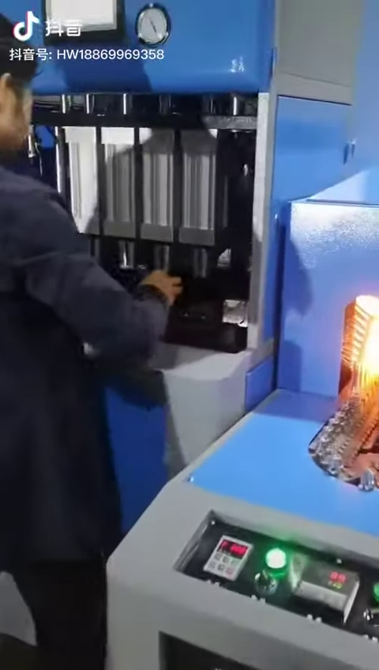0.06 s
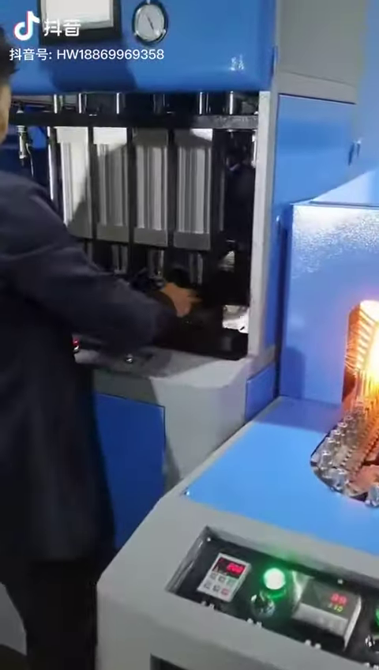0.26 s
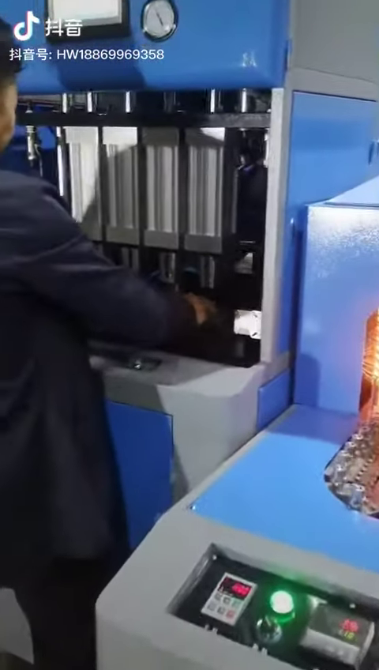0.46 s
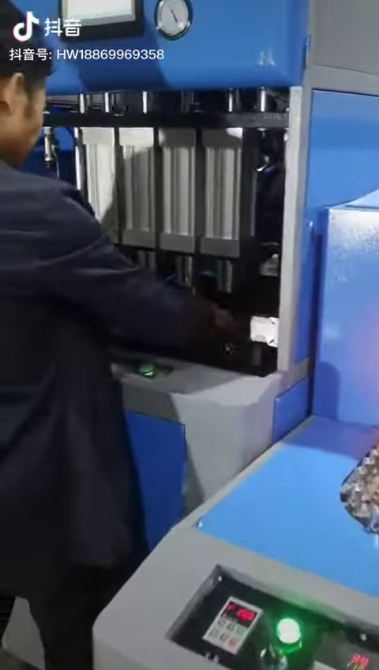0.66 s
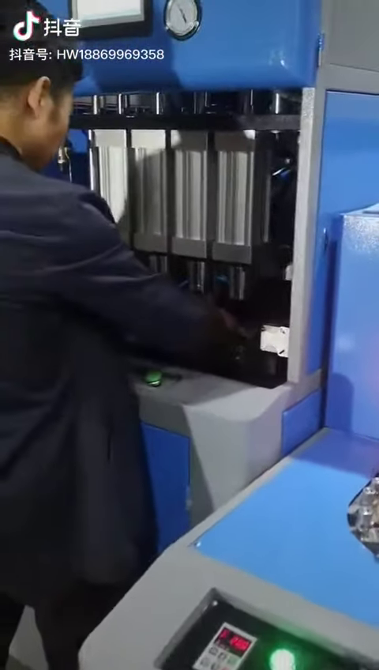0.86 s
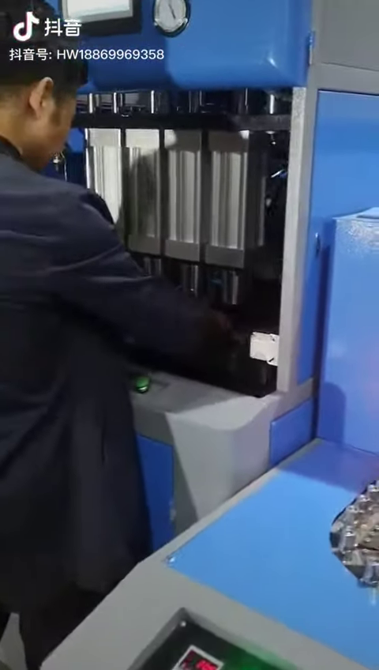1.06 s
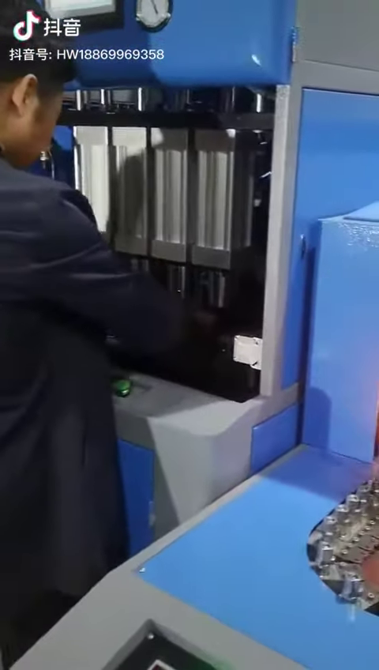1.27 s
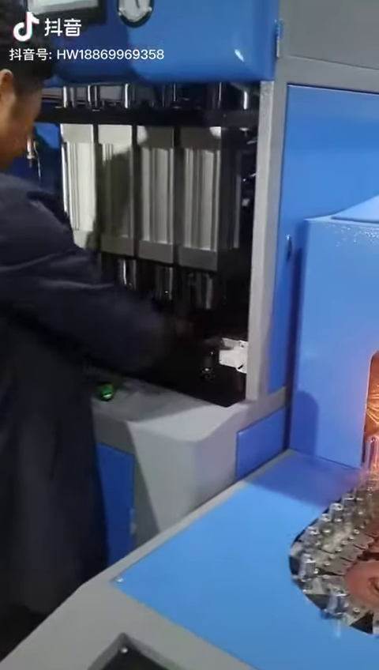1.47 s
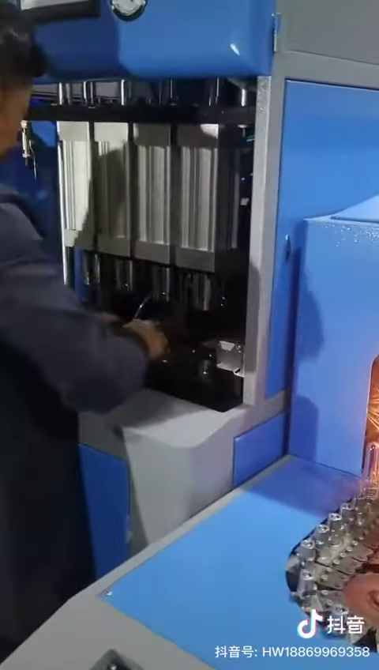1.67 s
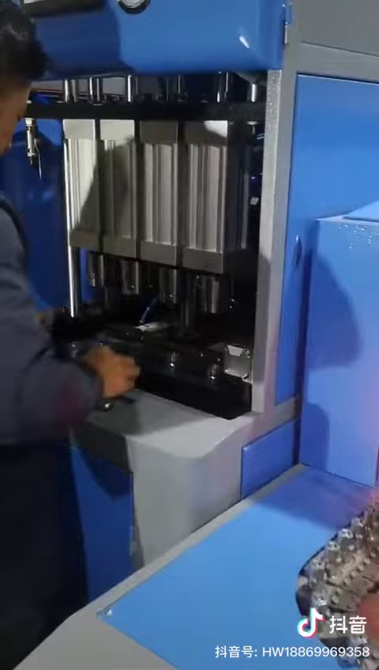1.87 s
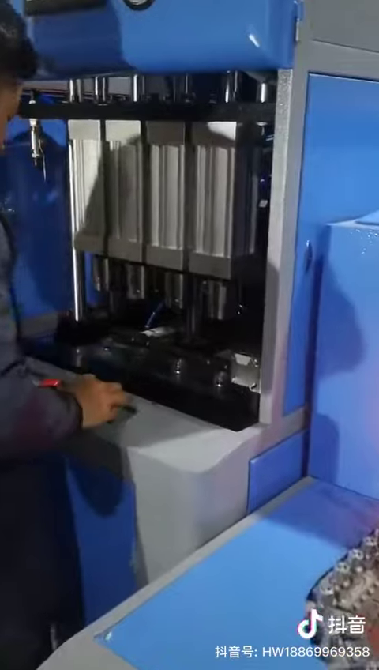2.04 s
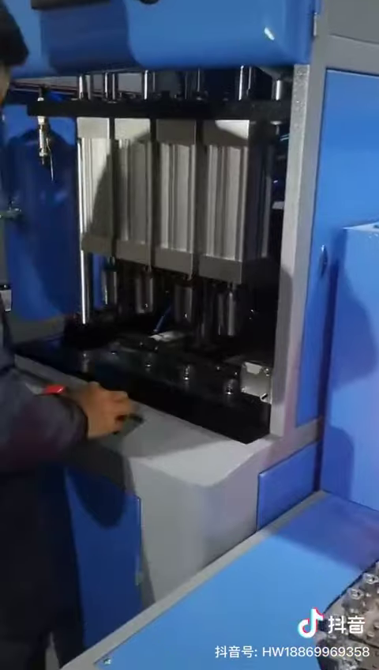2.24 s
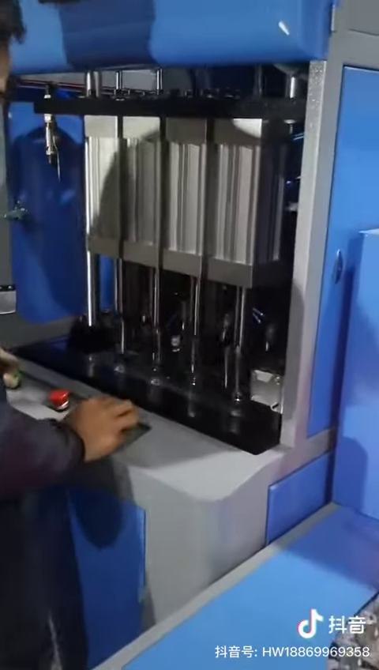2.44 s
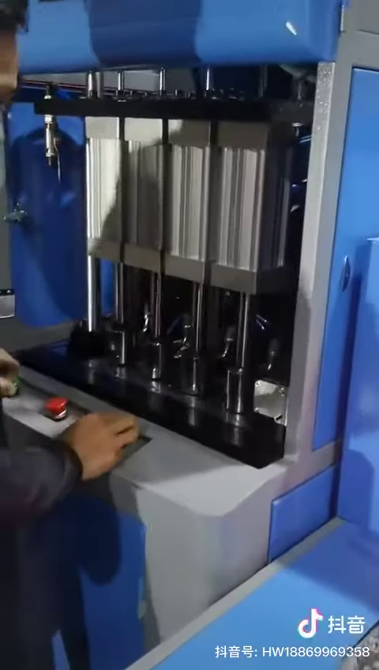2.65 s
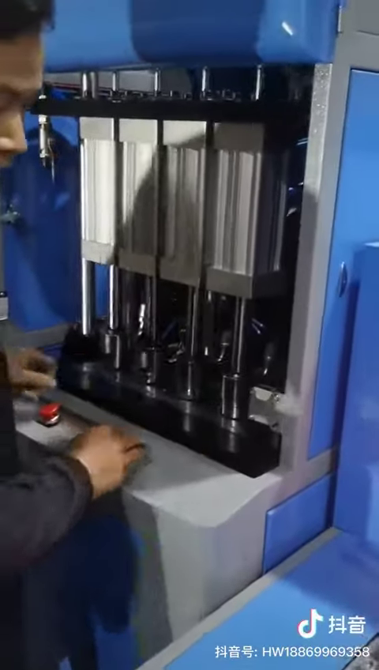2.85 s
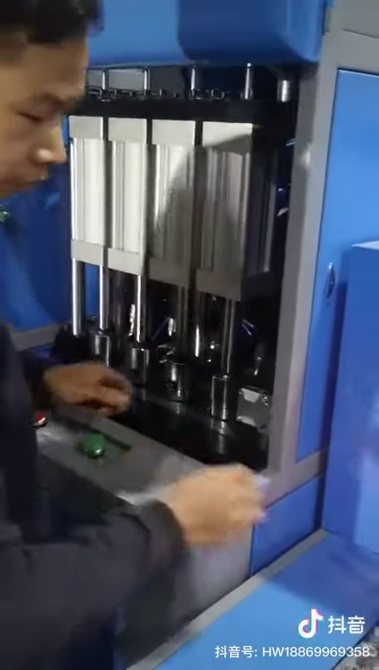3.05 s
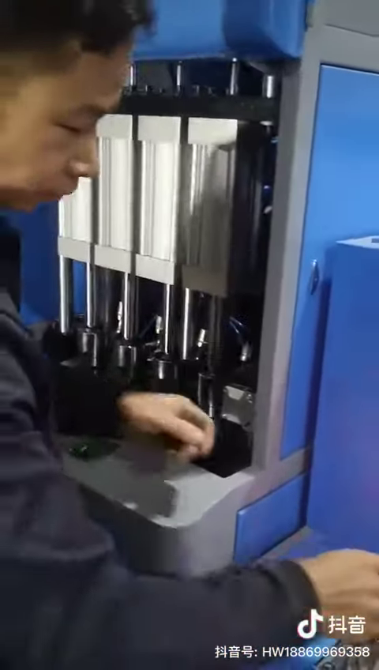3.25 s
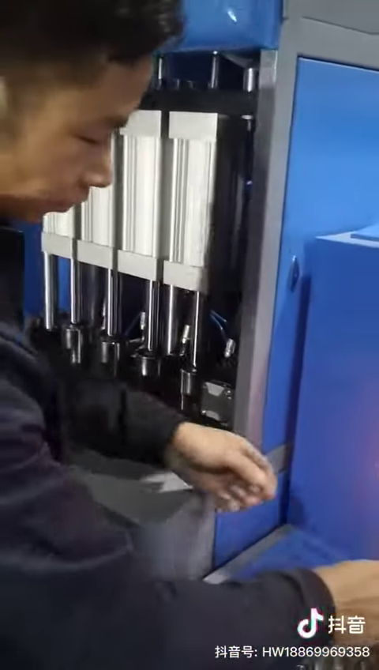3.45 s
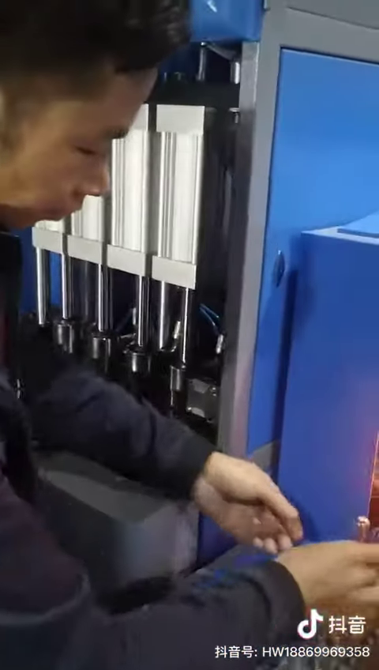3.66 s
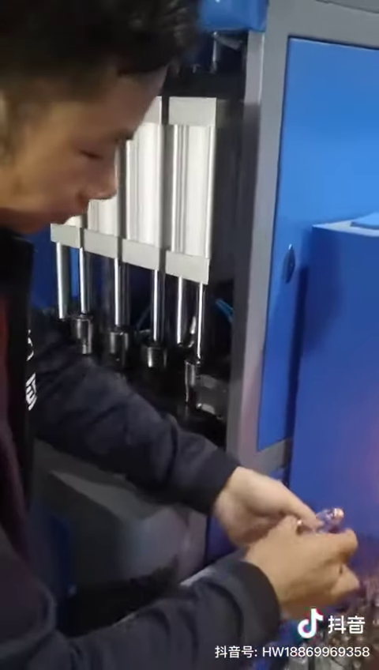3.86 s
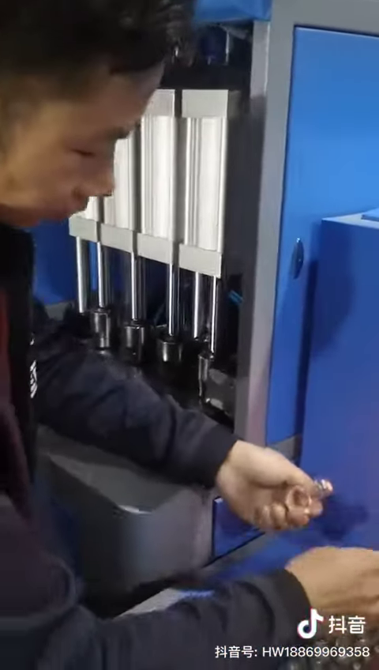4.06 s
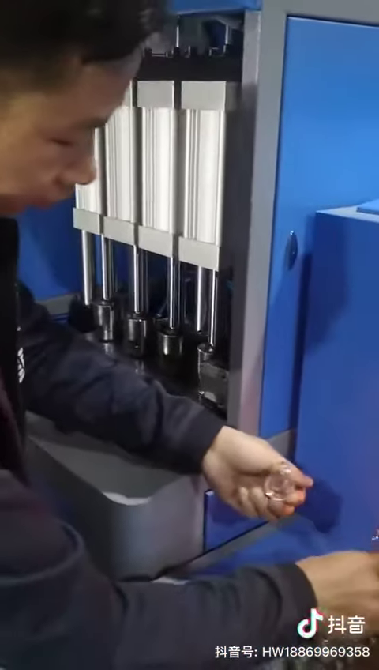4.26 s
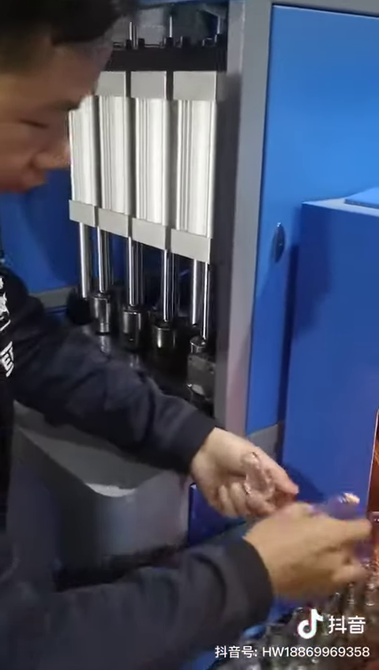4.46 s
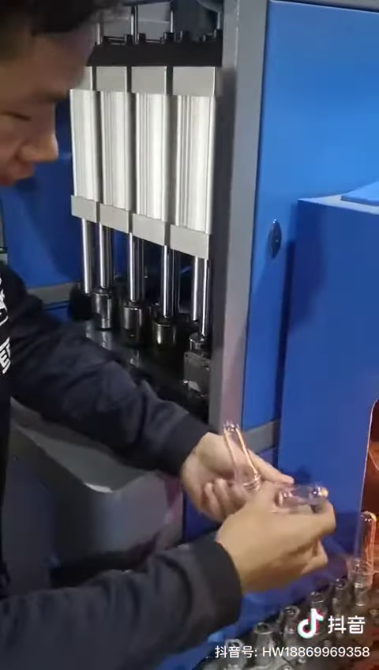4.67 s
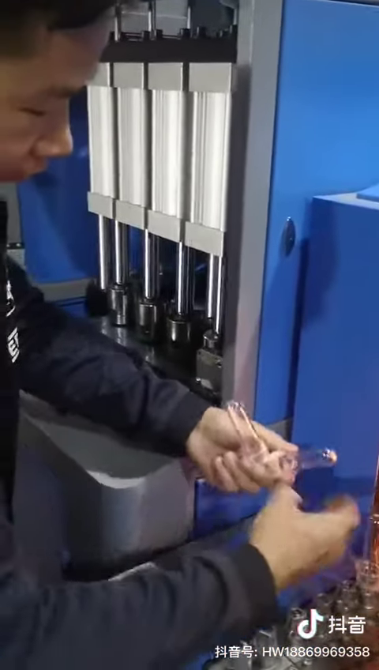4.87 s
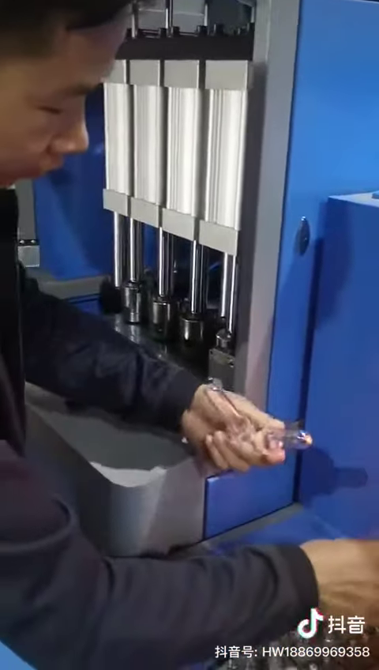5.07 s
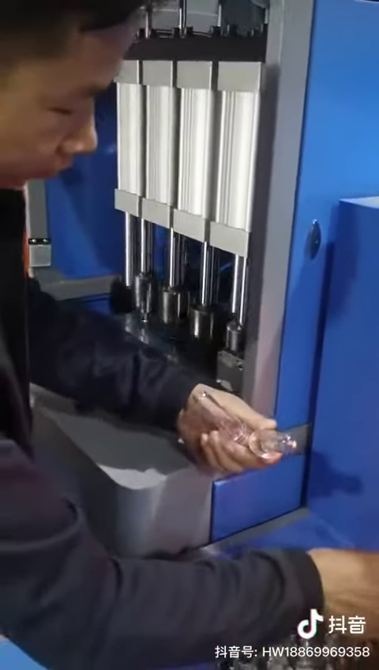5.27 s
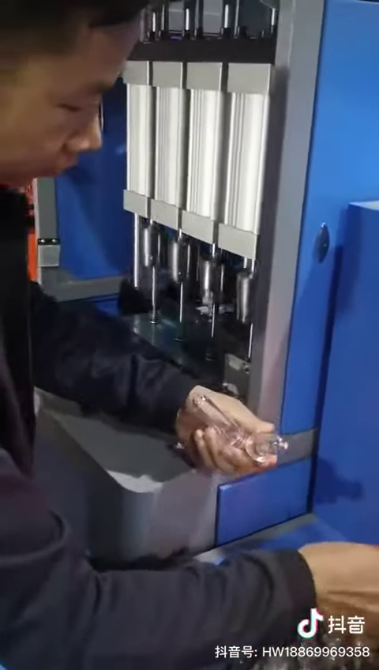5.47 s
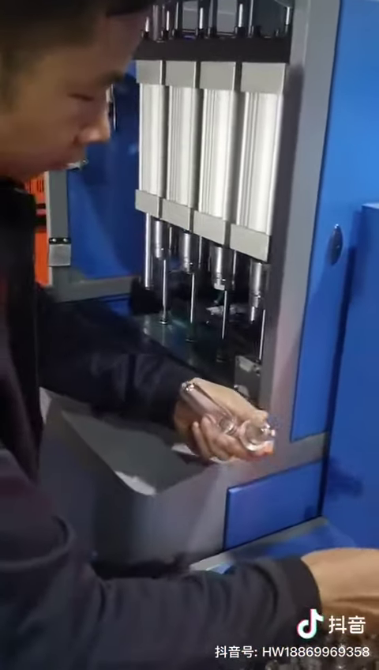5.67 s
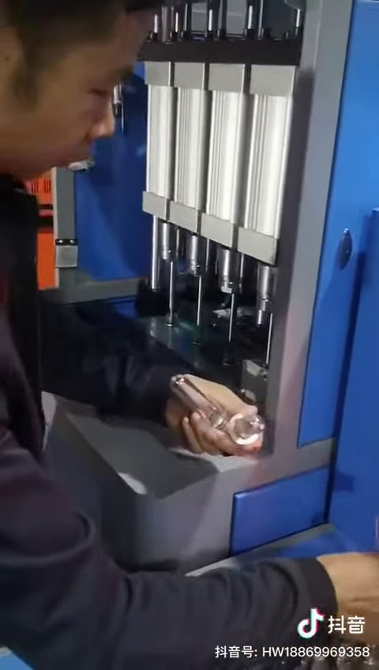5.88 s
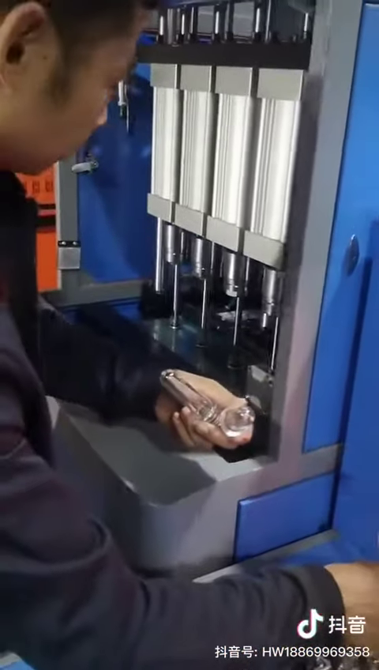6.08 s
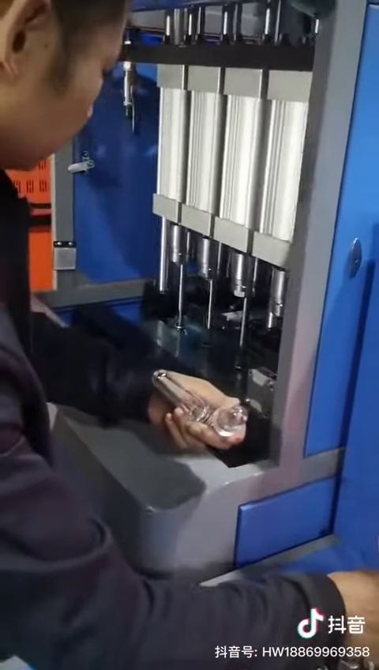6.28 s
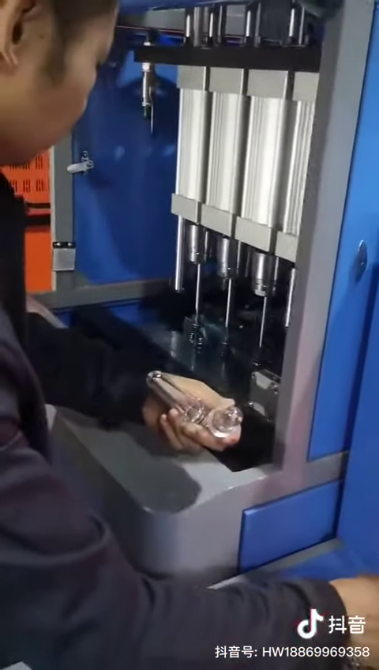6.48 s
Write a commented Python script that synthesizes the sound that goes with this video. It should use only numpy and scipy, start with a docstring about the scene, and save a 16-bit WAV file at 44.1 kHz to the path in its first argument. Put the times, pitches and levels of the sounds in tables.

```python
"""Air hisses out and squeaks die away over the throbbing drone of a piston compressor in a factory hall.
Then a bottle blow-moulding machine works through its cycle: noise jets vent and cracks with ringing steel
clack as the mould closes and the rods go down. Air leaks while the bottles are blown, then blows off in loud
blasts that duck the drone, and the mould opens with low, swinging thuds. Gliding tones squeak and grainy
noise scrapes now and then; rumble and whirr lie beneath, and the hall echoes the air and the metal."""
import sys
import numpy as np
from scipy import signal
from scipy.fft import rfft, irfft
from scipy.io import wavfile
from scipy.ndimage import uniform_filter1d

SR = 44100
rng = np.random.default_rng(int(sys.argv[2]) if len(sys.argv) > 2 else 0)


def unload_wav(signal):
    """Save mono or channel-first audio to the path in sys.argv[1] as 16-bit WAV at rate SR, clipped to [-1, 1]."""
    wavfile.write(
        sys.argv[1],
        SR,
        np.round(np.clip(np.atleast_2d(signal).T, -1, 1) * 32767).astype(np.int16),
    )


N = 287532
T = np.arange(N) / SR
BINS = np.maximum(np.arange(N // 2 + 1) * SR / N, 1)  # [Hz]


def from_db(db):
    """Decibels to gain."""
    return 10 ** (np.asarray(db) / 20)


def rms_one(x):
    """Scale so that the mean of the channels has rms 1."""
    mid = np.atleast_2d(x).mean(0)
    return x / np.sqrt(np.mean(mid ** 2) + 1e-20)


def over_hz(points):
    """Join (frequency [Hz], value) points on a log-frequency axis."""
    hz, value = np.transpose(points)
    return np.interp(np.log(BINS), np.log(hz), value)


def drift(rate_hz):
    """Random wander with rms 1: noise whose spectrum falls off above the given rate."""
    white = rfft(rng.standard_normal(N))
    return rms_one(irfft(white / (1 + (BINS / rate_hz) ** 2), N))


def burst(start, swell, t60):
    """Smooth swell, then an exponential fade that drops 60 dB in t60 seconds."""
    age = T - start
    opening = np.clip(age / max(swell, 1e-4), 0, 1) ** 2
    fade_db = -60 * np.clip((age - swell) / t60, 0, 3)
    return opening * from_db(fade_db)


# How alike left and right are: (frequency [Hz], correlation [-1 to 1, limited on use])
STEREO_LIKENESS = [(60, 2), (140, 0.7), (200, 0.88), (350, 0.38), (600, -0.13), (1500, 0.12), (4000, 0),
                   (15000, 0)]
# Tonal balance between the sides: (frequency [Hz], left minus right [dB])
STEREO_LEAN = [(300, 0), (690, 2.5), (1280, -1), (2350, -1), (4330, 0.5), (6800, 4.5), (9000, 0),
               (13000, -6.5)]


def spread_stereo(spectra):
    """Mix two unrelated spectra to left and right: alike in the bass, each side with its own colour."""
    alike = np.clip(over_hz(STEREO_LIKENESS), -1, 1)
    sides = np.array([[1], [-1]])
    shared = np.sqrt(1 + alike) * spectra[0]
    opposed = sides * np.sqrt(1 - alike) * spectra[1]
    return irfft((shared + opposed) * from_db(sides * over_hz(STEREO_LEAN) / 2), N)


def noise(spectrum_db):
    """Stereo noise of the given colour; the mean of its channels has rms 1."""
    white = rfft(rng.standard_normal((2, N)))
    return rms_one(spread_stereo(white * from_db(spectrum_db)))


def cabinet(echo_share, longest_s=.03, count=14):
    """Reflections off the steel panels comb the sound, differently on each side; in dB."""
    echoes = np.zeros((2, N))
    for side in echoes:
        delays = (rng.uniform(.05, 1, count) * longest_s * SR).astype(int)
        side[delays] = rng.choice([-1, 1], count) * echo_share / np.sqrt(count)
    echoes[:, 0] = 1  # the direct sound
    return 20 * np.log10(abs(rfft(echoes)) + 1e-6)


# Steady beds as the microphone moves about: (time [s], drone [dB], rumble [dB], whirr [dB])
STEADY_LEVELS = [(0, -33.5, -38, -40), (.9, -31.5, -37, -39), (2.2, -31.5, -38, -39.5),
                 (3.3, -32, -38, -37.5), (4.0, -29.5, -43, -40), (4.9, -31, -38, -40.5),
                 (5.8, -30.5, -37, -41.5), (6.52, -30.5, -38, -40)]


def steady_gains():
    """Gains of the drone, the rumble and the whirr over time."""
    s, *columns = np.transpose(STEADY_LEVELS)
    return [from_db(np.interp(T, s, db)) for db in columns]


# Low rumble of the hall: (frequency [Hz], relative level per Hz [dB])
RUMBLE_COLOUR = [(25, -9), (50, -3), (90, -3), (140, 0), (190, 2.5), (250, -5.5), (340, -4), (450, -16),
                 (700, -50)]
# Fans and conveyors: (frequency [Hz], relative level per Hz [dB])
WHIRR_COLOUR = [(300, -5.5), (520, -16), (700, -17.5), (900, -14), (1120, -11), (1330, -12), (1550, -8),
                (2400, -8.5), (3100, -17.5), (4200, -22.5), (5050, -21.5), (6500, -28), (9000, -32),
                (15000, -57)]


def background(rumble_gain, whirr_gain, flutter_db=0.88):
    """Rumble of the hall and the fluttering whirr of fans and conveyors, both as coloured noise."""
    rumble = rumble_gain * noise(over_hz(RUMBLE_COLOUR))
    whirr = whirr_gain * noise(over_hz(WHIRR_COLOUR) + cabinet(echo_share=0.37))
    return rumble + whirr * from_db(flutter_db * drift(25))


def drone(orders, stroke, sweep, turns_per_s=12.82):
    """Pipes and tank smear each stroke into a chirping throb: each order is delayed against the one below.

    stroke is a share of a turn; sweep is the delay per order, also in turns (negative is earlier).
    """
    turns = turns_per_s * T - stroke + .003 * drift(.7)
    lines = 0
    for k, db in orders:
        order = round(k)
        lines = lines + from_db(db) * np.cos(2 * np.pi * order * (turns - sweep * order / 2))
    return rms_one(lines)


# Compressor harmonics before the throb changes: (multiple of turn rate, relative level [dB])
EARLY_ORDERS = [(2, -14), (3, -15), (4, -4), (5, -17), (6, -18), (7, -10), (8, -18), (9, -14), (11, -10),
                (12, -8), (13, -9), (14, -8), (15, -3), (16, -7), (17, -10), (18, -19), (20, -16),
                (21, -17), (22, -16), (23, -21), (25, -22), (26, -19), (27, -17), (30, -20), (32, -20)]
# Compressor harmonics after the throb changes: (multiple of turn rate, relative level [dB])
LATE_ORDERS = [(2, -13), (3, -14), (4, -4), (5, -20), (6, -16), (7, -8), (9, -14), (10, -16), (11, -8),
               (12, -5), (13, -11), (14, 0), (15, -18), (16, -7), (17, -11), (18, -12), (20, -23),
               (21, -17), (24, -19), (26, -22), (27, -18), (28, -18), (29, -22)]


def compressor(change_s=2.3, crossfade_s=0.1):
    """Piston-stroke harmonics, whose strongest line steps down once as the throb changes."""
    late = np.clip((T - change_s) / crossfade_s + .5, 0, 1)
    rising = drone(EARLY_ORDERS, stroke=.055, sweep=.122)
    lumpy = drone(LATE_ORDERS, stroke=.24, sweep=-.376)
    return np.sqrt(1 - late) * rising + np.sqrt(late) * lumpy


# Parts that slide and rub: (time [s], swell [s], t60 [s], level [dB], centre [Hz])
SLIDING_PARTS = [(.46, 0.065, 0.96, -34.5, 232), (.47, 0.04, 0.89, -45.5, 730),
                 (.69, 0.032, 0.43, -43, 2850), (.69, .06, 0.78, -45, 915), (2.21, .012, .15, -55, 11000),
                 (2.275, .015, .2, -57, 11000), (3.313, 0.011, 0.27, -43.5, 625),
                 (5.64, 0.041, 0.26, -31.5, 710), (5.66, 0.045, .35, -36, 446),
                 (5.67, 0.025, 0.26, -32, 271), (5.75, .15, 2.5, -50.5, 845),
                 (6.2, 0.053, 0.17, -38.5, 8900), (6.3, 0.02, 0.9, -40.5, 8600),
                 (6.355, 0.02, 0.25, -39, 1790), (6.36, 0.088, 0.79, -35, 228),
                 (6.485, 0.013, .3, -38, 2600)]


def scrapes(grain_db=3.0, sharpness=2.46):
    """Sliding parts stick and slip, so their noise comes in grains, each part around its own frequency."""
    rubbing = 0
    for s, swell, t60, db, hz in SLIDING_PARTS:
        colour_db = -20 * np.log10(1 + (sharpness * np.log(BINS / hz)) ** 4)
        rubbing = rubbing + from_db(db) * burst(s, swell, t60) * noise(colour_db)
    return rubbing * from_db(grain_db * drift(140))


# Squeaks and whistles: (time [s], swell [s], t60 [s], first pitch [Hz], last pitch [Hz], width [Hz], level [dB])
SQUEAK_TONES = [(0, 0.0032, 0.45, 6570, 6630, 23, -27.5), (0, 0.014, 0.31, 9030, 8700, 54, -35.5),
                (0, .02, 2, 736, 744, 18, -45), (0, 0.016, 1.6, 1730, 1664, 44, -46),
                (0, .02, 2, 2040, 2100, 40, -43), (0, 0.316, 1.8, 2445, 2482, 60, -39),
                (0.029, 0.056, 0.71, 6960, 6904, 16, -27), (0.121, 0.042, 0.35, 7000, 6885, 15, -16.5),
                (0.191, 0.021, 0.44, 6930, 6900, 170, -25), (.05, .11, .3, 13980, 13800, 30, -47),
                (.23, 0.032, 0.11, 6040, 5940, 650, -34), (.265, 0.016, 0.29, 9130, 9280, 69, -29.5),
                (4.82, 0.014, 0.068, 5210, 5060, 250, -27), (5.14, .08, .15, 10100, 10000, 700, -30.5),
                (5.32, 0.017, 0.1, 5260, 4990, 300, -21), (5.38, 0.017, 0.18, 2454, 2433, 240, -11.5),
                (5.45, 0.18, 0.43, 12700, 12270, 450, -25.5), (5.6, 0.093, 0.12, 12600, 12260, 600, -25),
                (5.65, 0.053, 0.57, 535, 532, 69, -42), (6.28, 0.021, 0.18, 6680, 6320, 100, -22.5),
                (6.31, 0.037, 0.16, 6340, 5720, 900, -26), (6.365, 0.015, 0.16, 1706, 1575, 120, -27)]


def squeaks(pure_width_hz=70):
    """Tones that glide in pitch as they sound: the narrow ones sing, the wide ones are breathy."""
    out = np.zeros((2, N))
    for start, swell, t60, first_hz, last_hz, width, db in SQUEAK_TONES:
        hz = np.interp(T, [start, start + swell + t60 / 4], [first_hz, last_hz])
        pure = np.exp(-width / pure_width_hz)
        unsteady = (drift(width / 2) + 1j * drift(width / 2)) / np.sqrt(2)
        breath = np.sqrt(pure) + np.sqrt(1 - pure) * unsteady
        tone = breath * np.exp(2j * np.pi * np.cumsum(hz) / SR) * burst(start, swell, t60)
        lean = np.interp(first_hz, BINS, over_hz(STEREO_LEAN))
        side_gains = from_db(db + np.array([[lean], [-lean]]) / 2)
        out += side_gains * np.array([tone.real, tone.imag])  # the sides are a quarter cycle apart
    return out


# Heavy moves of the mould: (time [s], swell [s], t60 [s], level [dB], pitch [Hz])
MOULD_THUDS = [(.52, 0.026, .3, -34, 275.5), (2.305, 0.025, 0.27, -27.5, 79.4),
               (3.32, 0.026, 0.54, -31, 36.2), (3.331, 0.071, 0.28, -31, 89.3),
               (5.291, 0.055, 0.25, -29, 74), (5.34, 0.058, 0.25, -18, 37.5), (5.499, .06, 0.23, -24, 39),
               (5.541, 0.049, 0.39, -21.5, 61.8)]


def thuds(unevenness=0.96):
    """The heavy mould sets the housing swinging as it starts and stops: fading sines of uneven phase."""
    out = 0
    for s, swell, t60, db, hz in MOULD_THUDS:
        phase = 2 * np.pi * hz * (T - s) + unevenness * drift(23)  # [radians]
        out = out + from_db(db) * burst(s, swell, t60) * np.sqrt(2) * np.sin(phase)
    return out


# Parts hitting their stops: (time [s], crack level [dB], crack t60 [s], ring drive [dB])
STOP_HITS = [(2.939, -28, 0.066, -52), (3.32, -35, 0.13, -52), (4.829, -40, 0.051, -64),
             (4.888, -25, 0.068, -45), (5.389, -16, 0.21, -29.5), (6.492, -38, 0.17, -50)]
# Ringing modes of the steel frame: (frequency [Hz], drive added to each hit's [dB], t60 [s])
FRAME_MODES = [(1640, -15, .15), (1864, 15, 0.066), (2460, 18, 0.15), (2555, 12.5, 0.15), (5060, -15, .1),
               (5660, 7, .08), (6900, -18, .12)]


def clacks(crack_low_hz=1500, crack_high_hz=8000):
    """A part hits its stop: a short noise crack, and the steel frame rings as a set of resonators."""
    low_edge = 1 + (crack_low_hz / BINS) ** 4
    high_edge = (1 + (BINS / crack_high_hz) ** 4) * (1 + BINS / crack_high_hz)
    crack = noise(-10 * np.log10(low_edge * high_edge))
    out = crack * sum(from_db(db) * burst(s, 0.0004, t60) for s, db, t60, _ in STOP_HITS)
    for hz, mode_db, t60 in FRAME_MODES:
        hits = np.zeros((2, N)) + 1e-18
        for s, _, _, ring_db in STOP_HITS:
            # the drive varies at random from hit to hit and side to side
            hits[:, round(s * SR)] = from_db(ring_db + mode_db + rng.normal(0, 3.9, 2))
        decay = from_db(-60 / (t60 * SR))  # gain per sample
        turn = 2 * np.pi * hz / SR  # radians per sample
        out = out + signal.lfilter([0, np.sin(turn)], [1, -2 * decay * np.cos(turn), decay ** 2], hits)
    return out


def flow(start, swell, hold, t60, db, rise_db_per_s):
    """A valve opens, the pressure creeps up or down while it is held, then the line empties."""
    held = np.clip(T - start - swell, 0, max(hold, 0))
    emptying = np.maximum(T - start - swell - held, 0)
    opening = np.clip((T - start) / max(swell, 1e-4), 0, 1) ** 2
    return opening * from_db(db + rise_db_per_s * held - 60 * np.minimum(emptying / t60, 3))


# Valve openings: (time [s], swell [s], hold [s], t60 [s], level [dB], rise while held [dB/s], outlet [name])
VALVE_OPENING_AIR_JETS = [(0, 0.0017, 0.49, 2.5, -40.5, 1.5, "bleed"),
                          (2.319, 0.033, 0.31, 0.31, -22, -2, "close"),
                          (2.322, 0.035, 0.011, 0.73, -25.5, -5, "release"),
                          (2.42, 0.17, 0.12, 0.48, -28, 0, "rod"),
                          (2.808, 0.047, 0.29, 0.22, -36.5, 6, "nozzle"),
                          (2.931, 0.014, 0.0088, 0.18, -28.5, -2, "nozzle"),
                          (3.138, 0.046, .14, .9, -46, 0, "nozzle"),
                          (3.31, 0.0077, .035, 0.98, -28.5, -15, "rod"),
                          (3.324, 0.042, .004, .22, -27, -5, "release"),
                          (3.346, 0.018, .006, 0.59, -25.5, -5, "valve"),
                          (3.455, 0.14, 1.21, .5, -53.5, 4.5, "leak"),
                          (4.807, 0.025, 0.065, 0.12, -28.5, -5, "release"),
                          (4.823, 0.055, 0.033, .2, -26, 7, "blow-off"),
                          (4.877, 0.029, .008, 0.69, -12, -5, "release"),
                          (4.879, 0.039, 0.073, 1.3, -13.5, -17, "blow-off"),
                          (5.311, 0.012, 0.0084, 0.41, -25, -5, "release"),
                          (5.373, 0.019, .004, 0.15, -13, -4, "release"),
                          (5.383, 0.017, 0.12, .4, -26.5, -15, "release"),
                          (5.385, .02, 0.16, 0.45, -24.5, -6, "blow-off"),
                          (5.42, 0.15, 0.12, .45, -25.5, 17, "open"),
                          (5.65, 0.13, 0.8, 1.0, -38.5, 3, "bleed")]
# Resonances of pipes and silencers that colour all the air: (frequency [Hz], width [Hz], boost [dB])
PIPE_RESONANCES = [(722, 78, 7), (1490, 60, 1.5), (1700, 210, 1.5), (2415, 250, 3.5), (2960, 23, 6),
                   (3553, 100, 5), (6950, 120, 3.5), (6980, 50, 4), (7580, 82, 7), (7740, 30, 4),
                   (8900, 36, 1)]
# Colour of the bleeding air: (frequency [Hz], relative level per Hz [dB]), as for every outlet below
BLEED_COLOUR = [(400, -8), (720, -3), (1200, -18), (1750, 8.5), (2450, 1), (3200, -1), (5000, -1),
                (7200, -3.5), (9000, -5), (11000, -10), (15000, -18.5)]
# Air of the closing mould: (frequency [Hz], relative level per Hz [dB])
CLOSE_COLOUR = [(240, -45), (400, -5.5), (567, -14.5), (734, -7), (791, -12), (854, -5.5), (1120, -8),
                (1660, 3), (1910, 2), (2360, 0.5), (4810, -8), (7240, -6.5), (8300, -11), (10600, -11),
                (15000, -22)]
# Air at the nozzle: (frequency [Hz], relative level per Hz [dB])
NOZZLE_COLOUR = [(1000, -7), (2000, 2), (3500, 1), (5000, 1.5), (7300, 3), (10500, 1.5), (13000, -5),
                 (15000, -10)]
# Air of the rods: (frequency [Hz], relative level per Hz [dB])
ROD_COLOUR = [(240, -38), (400, -26), (495, -7), (712, -8), (1090, -8.5), (1640, 2.5), (2190, -0.5),
              (2390, 2.5), (3190, -7.5), (3890, -9), (7810, -12.5), (15000, -38)]
# Air at the valve: (frequency [Hz], relative level per Hz [dB])
VALVE_COLOUR = [(2500, -28), (3600, -3), (4500, -13), (5500, 2), (6500, -9), (7300, 8.5), (8300, -11),
                (11000, -13.5), (15000, -42)]
# Leaking air: (frequency [Hz], relative level per Hz [dB])
LEAK_COLOUR = [(3000, -25), (5000, -7), (6400, -3.5), (7100, -1), (7900, -2.5), (9500, -3), (12000, -9.5),
               (15000, -14)]
# Released air: (frequency [Hz], relative level per Hz [dB])
RELEASE_COLOUR = [(1200, -10.5), (2400, -4.5), (4000, -3.5), (5200, -0.5), (6300, 0), (7800, 2.5),
                  (9500, 2), (12000, -6), (15000, -12)]
# Air blowing off: (frequency [Hz], relative level per Hz [dB])
BLOW_OFF_COLOUR = [(300, -42), (450, -20), (600, -8.5), (730, -12), (920, -4), (1310, -11), (1740, 0),
                   (2390, 1.5), (3240, -3), (5000, -3.5), (7240, -5), (10100, -11.5), (15000, -26)]
# Air of the opening mould: (frequency [Hz], relative level per Hz [dB])
OPEN_COLOUR = [(300, -35.5), (450, -20), (530, -15.5), (700, -11), (1410, -9.5), (1770, -2), (2540, -3.5),
               (3450, -8.5), (7350, -9.5), (11200, -14), (12500, -14), (15000, -25)]


def air(turbulence_db=0.58):
    """Each valve lets out a turbulent jet, coloured by its outlet, by the pipes and by the panels around it."""
    pipes = sum(db / (1 + (2 * (BINS - hz) / width) ** 2) for hz, width, db in PIPE_RESONANCES)
    outlets = {"bleed": BLEED_COLOUR, "close": CLOSE_COLOUR, "nozzle": NOZZLE_COLOUR,
               "rod": ROD_COLOUR, "valve": VALVE_COLOUR, "leak": LEAK_COLOUR,
               "release": RELEASE_COLOUR, "blow-off": BLOW_OFF_COLOUR, "open": OPEN_COLOUR}
    out = 0
    for name, colour in outlets.items():
        flows = [flow(*jet) for *jet, outlet in VALVE_OPENING_AIR_JETS if outlet == name]
        strength = np.sqrt(sum(f ** 2 for f in flows))  # jets from one outlet add in power
        out = out + strength * noise(over_hz(colour) + pipes + cabinet(echo_share=0.44))
    return out * from_db(turbulence_db * drift(31))


def hall(x, dull_t60_s=1, treble_t60_s=0.32, split_hz=3670):
    """Diffuse echo of the hall, as decaying noise; the treble dies first."""
    white = rng.standard_normal((2, SR))
    dull = signal.sosfilt(signal.butter(2, split_hz, fs=SR, output="sos"), white)
    bright = signal.sosfilt(signal.butter(2, split_hz, "high", fs=SR, output="sos"), white[::-1])
    dull_tail = dull * burst(0.0084, 0.011, dull_t60_s)[:SR]
    bright_tail = bright * burst(0.0024, 0.0054, treble_t60_s)[:SR]
    tail = dull_tail + bright_tail
    tail = tail / np.sqrt(np.sum(tail ** 2, axis=1, keepdims=True))  # unit energy per side
    return signal.fftconvolve(x, tail, axes=1)[:, :N]


def scene(metal_echo_db=-8.5, air_echo_db=-13):
    """The machine close by, the compressor and the hall around it."""
    drone_gain, rumble_gain, whirr_gain = steady_gains()
    beds = background(rumble_gain, whirr_gain) + drone_gain * compressor()
    metal = scrapes() + squeaks() + clacks()
    jets = air()
    echo = hall(from_db(metal_echo_db) * metal + from_db(air_echo_db) * jets)
    return beds + thuds() + metal + jets + echo


def gain_control(x, threshold_db=-23.5, share=0.79, window_s=0.011, attack_s=0.0044, recovery_db_per_s=25.5):
    """The recorder's gain control takes away a share of what exceeds the threshold, then recovers steadily.

    Loud blasts turn the gain down, so the drone sinks under them and swells back.
    """
    power = uniform_filter1d(x.mean(0) ** 2, int(window_s * SR))
    excess_db = np.maximum(10 * np.log10(abs(power) + 1e-12) - threshold_db, 0)
    # the running maximum on a rising ramp lets the cut grow at once but shrink only at the recovery rate
    ramp_db = recovery_db_per_s * T
    cut_db = np.maximum.accumulate(share * excess_db + ramp_db) - ramp_db
    r = np.exp(-1 / (attack_s * SR))
    smooth_cut_db = signal.lfilter([1 - r], [1, -r], cut_db)
    return x * from_db(-smooth_cut_db)


def record(dry, cutoff_hz=15250):
    """The gain rides down on the blasts; the top is cut steeply."""
    top_cut = signal.ellip(12, .2, 80, cutoff_hz, fs=SR, output="sos")
    return signal.sosfilt(top_cut, gain_control(dry))


dry = scene()
out = record(dry)
unload_wav(out)
```